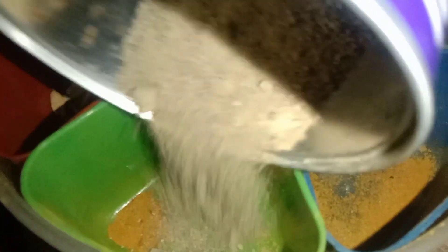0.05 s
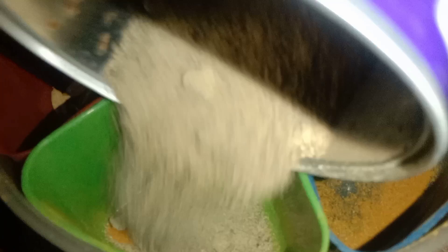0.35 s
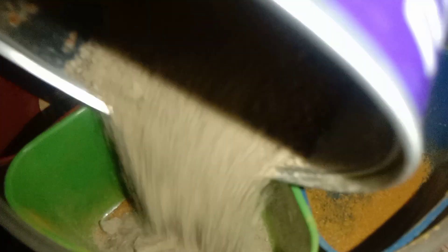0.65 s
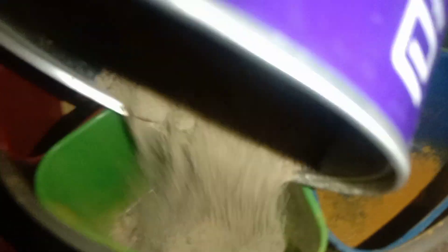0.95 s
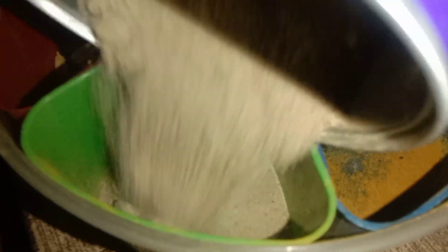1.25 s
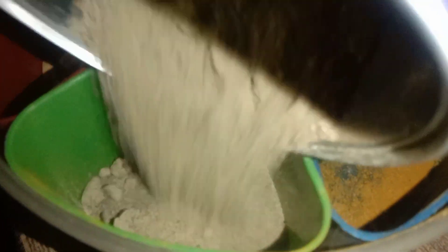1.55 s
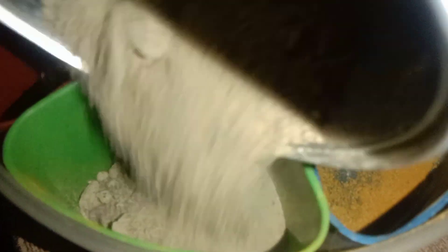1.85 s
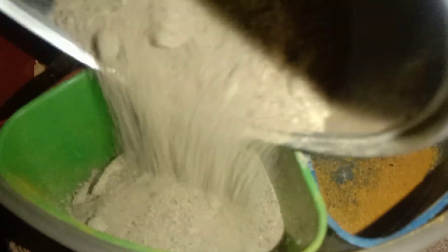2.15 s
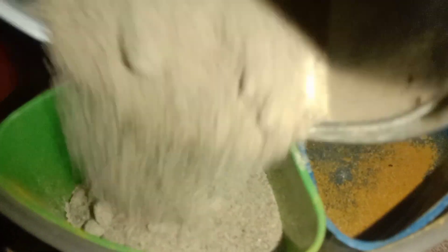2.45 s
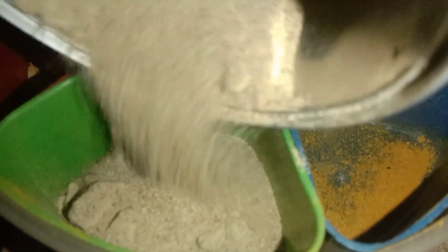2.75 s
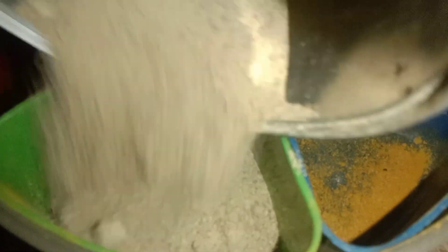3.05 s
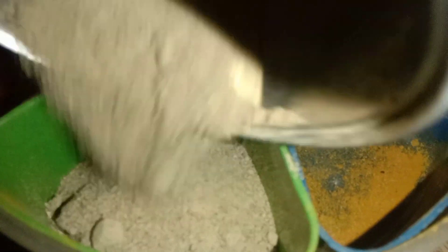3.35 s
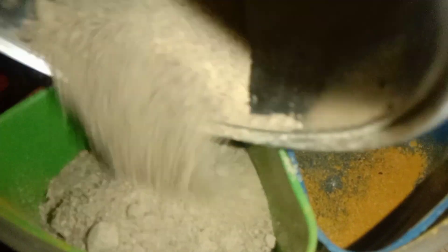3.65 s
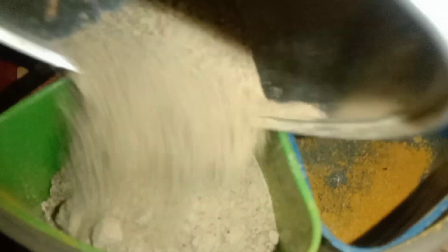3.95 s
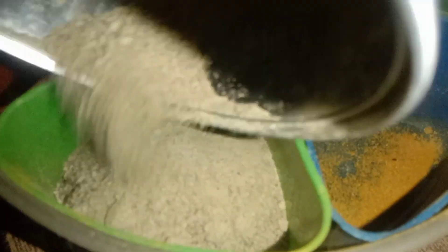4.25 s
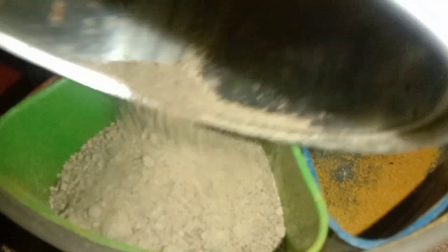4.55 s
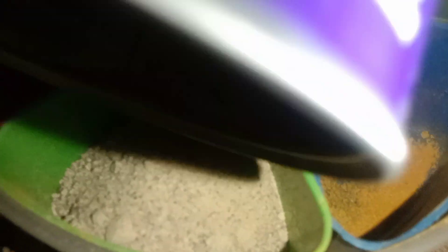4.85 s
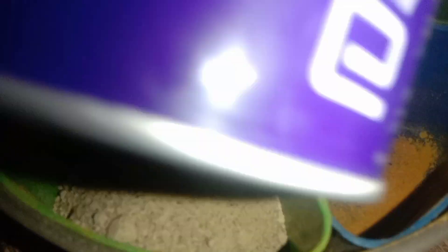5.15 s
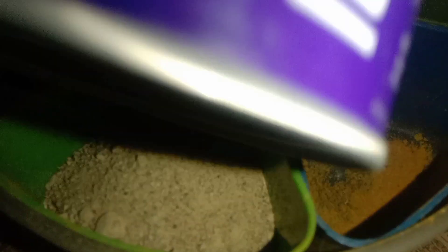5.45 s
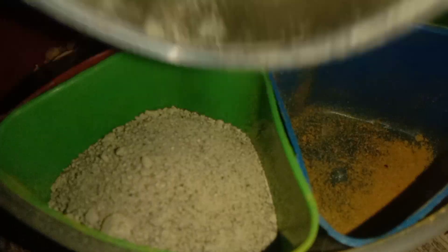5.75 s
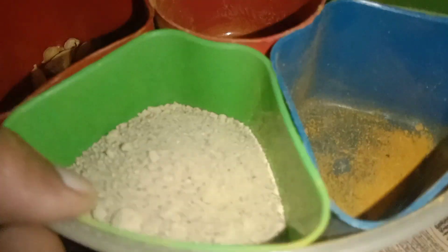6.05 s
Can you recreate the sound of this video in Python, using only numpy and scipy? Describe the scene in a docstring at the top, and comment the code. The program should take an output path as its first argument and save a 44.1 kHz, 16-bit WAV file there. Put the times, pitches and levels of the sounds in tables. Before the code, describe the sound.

Close in a kitchen, powder slides over steel in soft surges, followed by eight ringing knocks on a plastic box and a brief scrape.

```python
"""Spice powder is shaken out of a steel bowl into a plastic box, close by in a small kitchen.
Tiny grains hiss over the steel with each shake and patter down; lumps drop and the rim taps the box.
Eight knocks empty the bowl: the steel clinks and rings, the plastic knocks and the counter thumps.
Last, a hand slides the box away. A short echo, still air and a faint motor hum lie behind it all."""
import sys
import numpy as np
from scipy import signal
from scipy.io import wavfile
from scipy.ndimage import uniform_filter1d

SR = 44100
rng = np.random.default_rng(int(sys.argv[2]) if len(sys.argv) > 2 else 0)


def inscribe(sig):
    """Save sig as 16-bit PCM at rate SR to the path in sys.argv[1].

    A 1-D sig is mono; a 2-D sig holds one channel per row.
    Samples are clipped to [-1, 1] before scaling.
    """
    pcm = np.round(np.clip(np.atleast_2d(sig).T, -1, 1) * 32767)
    wavfile.write(sys.argv[1], SR, pcm.astype(np.int16))


N = 277433
TIME = np.arange(N) / SR
EMPTY_S = 5  # the bowl is all but empty by now

# shakes of the bowl: t/s at the loudest point, half length/s, level/dB
SHAKES = [(.05, 0.072, -41), (.195, 0.05, -37.5), (.3, 0.027, -45.5), (.43, 0.053, -42.5),
          (.575, 0.057, -43), (.74, 0.053, -63.5), (.955, .038, -52.5), (1.15, .047, -46.5),
          (1.305, .043, -41.5), (1.461, .028, -51), (1.61, 0.055, -59), (1.805, 0.039, -44),
          (1.98, 0.051, -46), (2.195, 0.06, -53), (2.35, 0.04, -57), (2.532, 0.042, -49),
          (2.715, 0.075, -52.5), (2.905, 0.055, -54.5), (3.07, 0.051, -57), (3.46, .043, -51),
          (3.61, .05, -56.5), (3.745, .035, -69), (4.145, .035, -68), (4.61, .02, -68)]
# tone of powder sliding on steel: f/Hz, level/dB
HISS_TONE = [(500, -39), (2300, -35), (2900, -13.5), (3700, -13.5), (4200, -25), (5300, -5), (6000, -1),
             (7100, -5), (7700, -13.5), (8900, -25), (10200, -19.5), (11000, -23), (15500, -14.5)]
# pitches the bowl adds to that hiss: f/Hz, width/Hz, level/dB
HISS_PEAKS = [(3130, 70, 0), (3640, 90, 15), (5260, 100, 4), (5760, 90, 2), (7550, 200, -3),
              (10100, 150, 2), (11900, 400, -1)]
# tone of powder landing on powder: f/Hz, level/dB
LANDING_TONE = [(60, -10.5), (150, -0.5), (420, -1), (700, -2), (1150, -7), (2200, -8.5), (3000, 3.5),
                (4500, -27), (9000, -47)]


def powder():
    """Fine grains rush over the steel with each shake, coarse ones tick, and all patter into the box."""
    skew = 0.27  # each surge rises quickly and falls slowly
    stick_db, stick_s = 1.5, .014  # the powder sticks and slips, so the flow is uneven
    sticking = unit_rms(uniform_filter1d(rng.standard_normal(N), size=int(stick_s * SR)))
    flow = swells(SHAKES, skew) * amp(stick_db * sticking)
    fine = grains(per_s=16000, spread_db=1.5)
    coarse = amp(-7) * grains(per_s=220, spread_db=3.5)
    falling = grains(per_s=3500, spread_db=2)
    stray = grains(per_s=400, spread_db=2.2)
    grit = amp(-11) * grains(per_s=70, spread_db=0.9)
    wall = bowl_wall(HISS_TONE, HISS_PEAKS, tail_db=-13, tail_s=0.006)
    sliding = flow * unit_rms(through(fine + coarse + grit, wall))
    fade = np.clip((EMPTY_S - TIME) / .7, 0, 1)  # stray grains fade away as the bowl runs out
    trickle = amp(-70.5) * fade * unit_rms(through(stray, wall))
    cushion_db_per_s = 1.5  # the growing heap softens the landing
    landing = swells(SHAKES, skew, delay_s=.025) * amp(-15.5 - cushion_db_per_s * TIME)
    return sliding + trickle + landing * unit_rms(through(falling, response(LANDING_TONE)))


# clumps slumping into the box: t/s, length/s, level/dB
SLUMPS = [(.5, 0.14, -59), (1.251, 0.12, -45), (3.117, 0.032, -68), (4.219, .15, -42.5),
          (5.096, .12, -54.5)]
# their dull tone: f/Hz, level/dB
SLUMP_TONE = [(40, -42.5), (100, 2), (170, 3.5), (280, -4), (600, -7.5), (1100, -11.5), (2000, -23),
              (5000, -41.5)]


def slumps():
    """A clump breaks up on the heap as a run of soft thuds."""
    thuds = through(grains(per_s=900, spread_db=2), response(SLUMP_TONE))
    out = np.zeros(N)
    for s, length, db in SLUMPS:
        count = int(length * SR)
        progress = np.arange(count) / count
        shape = progress ** 0.097 * (1 - progress) ** 1.3
        add(out, s, amp(db) * unit_rms(thuds[int(s * SR):][:count] * shape))
    return out


# hard lumps hitting the plastic: t/s, level/dB, f/Hz
LUMPS = [(.088, -46, 960), (0.291, -47, 1280), (0.318, -54.5, 1184), (1.167, -41.5, 1005),
         (2.041, -49.5, 1310), (2.063, -47, 1150)]


def lumps(steel, plastic):
    """Hard lumps tick off the rim and knock on the plastic."""
    out = np.zeros(N)
    for s, db, hz in LUMPS:
        add(out, s, tap(steel, plastic, clink_db=db - 3, wall_db=db, wall_hz=hz))
    return out


# knocks that empty the bowl: t/s, clink level/dB, contact time/s, box wall level/dB, box base f/Hz,
# weight of the blow/dB, wait until the bounce/s (0 for none)
KNOCKS = [(3.8181, -31.5, 0.0043, -39.5, 436, -55.5, 0.00075),
          (4.0137, -25.5, .0023, -38.5, 442, -46, 0.00072), (4.2201, -23, .002, -33, 400, -33.5, 0),
          (4.7848, -22, .009, -24, 467, -31.5, 0.0014), (4.992, -14, .0028, -20, 554, -31, .0105),
          (5.2047, -18.5, .0016, -31, 416, -48.5, .0155), (5.398, -20, .003, -31.5, 374, -34.5, .0188),
          (5.594, -18, 0.006, -18, 464, -33.5, 0)]
# notes of the hand-held bowl: f/Hz, level/dB, time to fade by 60 dB/s
BOWL_NOTES = [(428, 2, .28), (590, -8, .22), (730, -11, .35), (1010, -5, .2), (1120, -7, .22),
              (1235, -5, .3), (1410, -11, .15), (1615, -17, .22), (1920, -18, .15), (2834, -11, .2),
              (2955, -4, .18), (3338, -8, .15), (3460, -7, .16), (3646, -5, .2), (4735, -17, .13),
              (5290, -13, .13), (5760, -11, .13), (6320, -12, .12), (6600, -12, .12)]
# low notes of the box and the counter under it: f/Hz, level/dB, time to fade by 60 dB/s
COUNTER_NOTES = [(80.3, -2.5, 0.5), (112.8, -6, 0.69), (136, -8.5, 0.27), (182.6, -5.5, 0.29),
                 (280, -13.5, 0.21)]


def knocks(steel, plastic):
    """Hard blows: steel clinks, the box knocks, the bowl rings on and the counter thumps; some bounce."""
    out = np.zeros(N)
    for s, clink_db, contact_s, wall_db, base_hz, weight_db, bounce_s in KNOCKS:
        wall_hz = 877 * (1 + .025 * rng.standard_normal())  # each blow hits a different spot
        base_db = (clink_db + weight_db) / 2 - 2.5
        bowl = ring(BOWL_NOTES, scatter_db=2, rise_s=.005, detune=.0015)
        counter = ring(COUNTER_NOTES, scatter_db=1.5, rise_s=.012)
        add(out, s, amp(clink_db) * clink(steel, contact_s, chatter_db=-12.5, chatter_s=0.023))
        rub = graze(steel, lead_s=0.0027)
        add(out, s - len(rub) / SR, amp(clink_db - 28) * rub)
        add(out, s, amp(clink_db - 11.5) * clink(plastic, contact_s, chatter_db=-10, chatter_s=0.04))
        add(out, s, amp(base_db) * box_knock(base_hz, rise_s=0.0027))
        add(out, s + 0.00085, amp(wall_db) * box_knock(wall_hz, rise_s=0.0016))
        add(out, s, amp(weight_db + 3) * unit_hit(bowl))
        add(out, s, amp(weight_db) * unit_hit(counter))
        add(out, s, amp(weight_db + 0.5) * powder_jolt(fade_s=0.018))
        add(out, s, amp(weight_db - 25.5) * rim_note(s))
        if bounce_s:
            add(out, s + bounce_s, tap(steel, plastic, clink_db - 6, wall_db - 3.5, wall_hz))
    return out


# tone of the powder jolting in the bowl: f/Hz, level/dB
JOLT_TONE = [(50, -28), (85, 5.5), (125, 4), (200, -9.5), (320, -6.5), (500, -12), (900, -10.5),
             (2000, -43.5)]


def powder_jolt(fade_s):
    """The powder left in the bowl jolts and settles with a thud."""
    t = np.arange(SR // 3) / SR
    burst = rng.standard_normal(len(t)) * np.exp(-t / fade_s)
    return unit_hit(through(burst, response(JOLT_TONE)))


# light taps of the rim: t/s, clink level/dB, box wall level/dB, box wall f/Hz, box base level/dB
RIM_TAPS = [(.068, -38, -88, 900, -80), (.128, -34.5, -62, 1020, -83), (.1455, -25, -48, 1280, -65),
            (0.1505, -21.5, -24.5, 1240, -62), (.3366, -47, -72, 1110, -97),
            (0.4399, -24, -35, 1170, -42.5), (0.6649, -50, -66.5, 1020, -74), (.7004, -54, -87, 1200, -82),
            (.7978, -51, -49.5, 834, -50), (1.0078, -52, -83, 906, -94), (1.549, -52.5, -85, 1200, -86.5),
            (1.664, -59.5, -61.5, 1080, -67.5), (1.816, -28, -34.5, 890, -39.5),
            (1.9796, -41.5, -74, 1300, -67.5), (2.1047, -46.5, -74, 1230, -97),
            (2.166, -47.5, -79.5, 692, -72.5), (2.826, -49, -71, 880, -87), (3.2444, -52, -82.5, 1340, -89),
            (3.4699, -47.5, -59, 1270, -53.5), (3.547, -40.5, -75, 695, -79),
            (3.6405, -47.5, -61.5, 690, -73), (4.435, -47.5, -52.5, 825, -85)]


def rim_taps(steel, plastic):
    """The rim grazes and taps the box while the bowl is shaken."""
    out = np.zeros(N)
    for s, clink_db, wall_db, wall_hz, base_db in RIM_TAPS:
        rub = graze(steel, lead_s=0.0011)
        add(out, s - len(rub) / SR, amp(clink_db - 15.5) * rub)
        add(out, s, tap(steel, plastic, clink_db, wall_db, wall_hz))
        add(out, s, amp(base_db) * box_knock(hz=630, rise_s=0.0015))
        add(out, s, amp(base_db - 16) * rim_note(s))
    return out


def tap(steel, plastic, clink_db, wall_db, wall_hz):
    """One brief touch of steel and plastic; the powder muffles the bowl's low notes."""
    out = np.zeros(SR // 2)
    ringing = ring([note for note in BOWL_NOTES if note[0] > 900], scatter_db=3, rise_s=.004)
    add(out, 0, amp(clink_db) * clink(steel, 0.0014, chatter_db=-13.5, chatter_s=0.0042))
    add(out, 0, amp(wall_db - 6.5) * clink(plastic, 0.0039, chatter_db=-17.5, chatter_s=0.0074))
    add(out, 0, amp(wall_db) * box_knock(wall_hz, rise_s=0.001))
    add(out, 0, amp(wall_db - 11.5) * unit_hit(ringing))
    return out


def graze(steel, lead_s):
    """The rim rubs briefly, ever harder, until it hits."""
    t = np.arange(SR // 25) / SR
    return unit_hit(through(rng.standard_normal(len(t)), steel) * np.exp((t - t[-1]) / lead_s))


def clink(material, contact_s, chatter_db, chatter_s):
    """The rim buzzes against the box for a moment, then chatters out."""
    t = np.arange(SR // 4) / SR
    force = np.exp(-(t / (2 * contact_s)) ** 4) + amp(chatter_db) * np.exp(-t / chatter_s)
    return unit_hit(through(force * rng.standard_normal(len(t)), material))


def box_knock(hz, rise_s):
    """The plastic gives way and swings back and forth a few times."""
    t = np.arange(SR // 16) / SR
    return unit_hit(t ** 2 * np.exp(-1.5 * t / rise_s) * np.sin(2 * np.pi * hz * t))


def rim_note(s):
    """The rim sings on after a hit at time s: the emptier the bowl, the higher and louder."""
    full_hz, empty_hz, fade_s = 550, 723, .8
    fullness = np.clip(1 - s / EMPTY_S, 0, 1)
    hz = empty_hz + (full_hz - empty_hz) * fullness
    return ring([(hz, -12.5 * fullness, fade_s)], scatter_db=1, rise_s=.005, detune=.003)


def ring(notes, scatter_db, rise_s, detune=0.0089):
    """Fading notes; each blow lands elsewhere, and the damping of the hand moves their pitch a little."""
    t = np.arange(SR // 2) / SR
    hz, db, fade_s = np.transpose(notes)[:, :, None]
    db = db + scatter_db * rng.standard_normal(hz.shape)
    hz = hz * (1 + detune * rng.standard_normal(hz.shape))
    waves = amp(db - 60 * t / fade_s) * np.sin(2 * np.pi * (hz * t + rng.random(hz.shape)))
    return waves.sum(0) * (1 - np.exp(-t / rise_s))


# tone of a hit on steel: f/Hz, level/dB
STEEL_TONE = [(150, -46.5), (500, -33.5), (1300, -18), (2350, -18.5), (3000, -1.5), (3750, -6.5),
              (4200, -18.5), (5400, 3.5), (6700, -1.5), (7400, -7), (8400, -27), (10200, -29.5),
              (15500, -22.5)]
# pitches the bowl adds to each hit: f/Hz, width/Hz, level/dB
STEEL_PEAKS = [(2800, 790, -11.5), (3611, 200, 6), (5150, 40, -4), (5930, 74, -3), (6600, 40, -5),
               (7700, 40, -3.5), (10250, 420, -1.5)]
# tone of a hit on the plastic wall: f/Hz, level/dB
PLASTIC_TONE = [(150, -39.5), (400, -25), (560, 2), (720, -3), (1250, 1), (1900, -5.5), (2400, -14),
                (4000, -29.5)]


def materials():
    """How the steel and the plastic each answer one sharp hit."""
    return bowl_wall(STEEL_TONE, STEEL_PEAKS, tail_db=-12.5, tail_s=0.0097), response(PLASTIC_TONE)


def bowl_wall(tone, peaks, tail_db, tail_s):
    """The steel answers at once, then shimmers with many close notes that die quickly."""
    t = np.arange(SR // 16) / SR
    shimmer = rng.standard_normal(len(t)) * np.exp(-t / tail_s) * (1 - np.exp(-t / 0.0076))
    shimmer *= amp(tail_db) / np.linalg.norm(shimmer)
    shimmer[0] = 1  # the hit itself
    return signal.fftconvolve(response(tone, peaks), shimmer)


# pushes of the hand on the box: t/s at the loudest point, half length/s, level/dB
PUSHES = [(6.08, 0.043, -56.5), (6.275, 0.076, -39.5)]
# tone of plastic scraping the counter: f/Hz, level/dB
SCRAPE_TONE = [(150, -35), (700, -23), (1080, -8.5), (1330, -19.5), (1650, -12.5), (2250, -21.5),
               (3130, -1.5), (4250, -15.5), (5650, 0.5), (7300, -7), (8700, -25.5), (15000, -22)]


def box_slide():
    """The box scrapes over the counter in many small slips."""
    slips = grains(per_s=12000, spread_db=1.5)
    return swells(PUSHES, skew=0.079) * unit_rms(through(slips, response(SCRAPE_TONE)))


# how long the kitchen echoes: f/Hz, time to fade by 60 dB/s
ECHO_FADE = [(100, 0.85), (500, 0.16), (1500, 0.27), (3500, 0.25), (7000, 0.6), (15000, 0.067)]
# tone of the echo: f/Hz, level/dB
ECHO_TONE = [(100, -16), (400, -1.5), (900, -8), (2000, -4.5), (3200, -8), (6000, -24), (15000, -7.5)]


def kitchen_echo(x, first_s=0.005):
    """Sound bounces around the room, each pitch dying away at its own speed."""
    t = np.arange(SR // 2) / SR
    echoes = rng.choice([-1., 1.], len(t)) * (rng.random(len(t)) < 4000 / SR) * (t > first_s)
    hz, s, bands = signal.stft(echoes, SR, nperseg=256)
    decay = amp(-60 * s / value_at(ECHO_FADE, hz)[:, None])
    decay *= amp(value_at(ECHO_TONE, hz))[:, None] / np.sqrt(np.mean(decay ** 2, axis=1, keepdims=True))
    room = signal.istft(bands * decay, SR, nperseg=256)[1] / np.linalg.norm(echoes)
    return through(x, room)


# tone of the still kitchen: f/Hz, level/dB
AIR_TONE = [(25, -22), (55, -20), (80, 1), (120, -5), (170, -5), (220, -15.5), (270, -11.5), (400, -18.5),
            (1200, -19.5), (2200, -26), (3600, -21), (4300, -34), (6000, -26), (9000, -33), (16000, -38.5)]
# notes of a faint motor hum: f/Hz, level/dB
HUM_NOTES = [(90, -71.5), (178, -70.5), (268, -75)]


def background():
    """Still air is a soft noise; a motor hums on three steady notes."""
    air = amp(-67.5) * unit_rms(through(rng.standard_normal(N), response(AIR_TONE)))
    hum = sum(amp(db) * unit_rms(np.sin(2 * np.pi * (hz * TIME + rng.random()))) for hz, db in HUM_NOTES)
    return air + hum


def grains(per_s, spread_db):
    """A stream of tiny hits of uneven size."""
    sizes = amp(spread_db * np.minimum(rng.exponential(1, N), 4))
    return unit_rms(rng.standard_normal(N) * sizes * (rng.random(N) < per_s / SR))


def swells(moves, skew, delay_s=0):
    """Loudness of a run of hand movements; skew shortens each rise and stretches each fall."""
    t = TIME - delay_s
    power = np.zeros(N)
    for s, half_s, db in moves:
        width_s = half_s * (1 + skew * np.sign(t - s))
        power += amp(db) ** 2 * np.exp(-2 * ((t - s) / width_s) ** 2)
    return np.sqrt(power)


def amp(db):
    """Turns decibels into a number to multiply by."""
    return 10 ** (np.asarray(db) / 20)


def unit_rms(x):
    """Scales a sound to an average strength (rms) of 1."""
    return x / np.sqrt(np.mean(x ** 2) + 1e-20)


def unit_hit(x):
    """Scales a short sound to the energy of 10 ms at strength 1."""
    return x / np.sqrt(np.sum(x ** 2) / (SR / 100) + 1e-20)


def value_at(table, hz):
    """Looks up a value between a table's rows, with octaves evenly spaced."""
    f, value = np.transpose(table)
    return np.interp(np.log(hz + 1), np.log(f + 1), value)


def add(mix, s, sound):
    """Mixes a sound in at time s."""
    part = mix[max(round(s * SR), 0):][:len(sound)]
    part += sound[:len(part)]


def response(tone, peaks=(), size=4096):
    """A click with the given tone, plus ringing peaks, to use as a filter."""
    hz = abs(np.fft.fftfreq(size, 1 / SR))
    boost = sum(amp(db) / (1 + (2 * (hz - f) / width) ** 2) for f, width, db in peaks)
    gain = amp(value_at(tone, hz)) * (1 + boost)
    spectrum = np.exp(np.conj(signal.hilbert(np.log(gain))))  # nothing sounds before the click
    return np.fft.ifft(spectrum).real[:size // 2]


def through(x, click):
    """Filters x so that it takes on the click's tone and ringing."""
    return signal.oaconvolve(x, click)[:len(x)]


def suppress(x, margin_db, depth_db):
    """Turns down each band of pitches while it is near its own background level."""
    bands = signal.stft(x, SR, nperseg=512, noverlap=384)[2]
    power = uniform_filter1d(uniform_filter1d(abs(bands) ** 2, size=5, axis=-1), size=3, axis=-2)
    floor = np.percentile(power, 10, axis=-1, keepdims=True) * amp(margin_db) ** 2
    gain = np.maximum(power / (power + floor + 1e-20), amp(depth_db))
    return signal.istft(bands * gain, SR, nperseg=512, noverlap=384)[1][:, :N]


def scene():
    """Powder, hits and the sliding box, with the kitchen's echo and background."""
    steel, plastic = materials()
    hits = knocks(steel, plastic) + rim_taps(steel, plastic) + lumps(steel, plastic)
    rustle = powder() + slumps() + box_slide()
    return (hits + rustle + kitchen_echo(hits + amp(-2) * rustle) + background())[None]


def record(dry):
    """Turns down faint noise, rounds off the loudest peaks and cuts the highest treble."""
    ceiling, cutoff_hz = .8, 15750
    quiet = suppress(dry, margin_db=7.5, depth_db=-10)
    rounded = quiet / (1 + (quiet / ceiling) ** 4) ** .25
    lowpass = signal.firwin(255, cutoff_hz, window=("kaiser", 8), fs=SR)
    return signal.oaconvolve(rounded, lowpass[None], "same")


dry = scene()
out = record(dry)
inscribe(out)
```